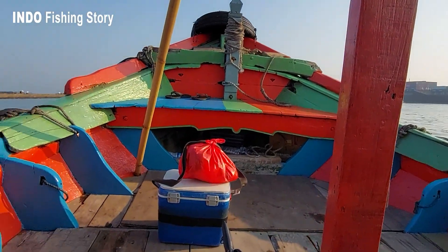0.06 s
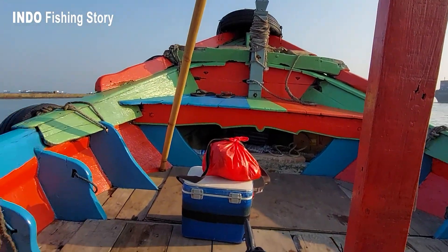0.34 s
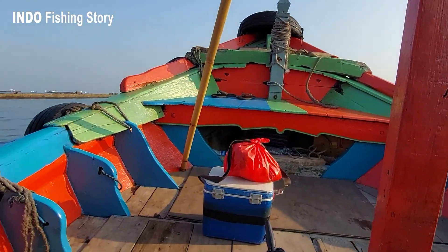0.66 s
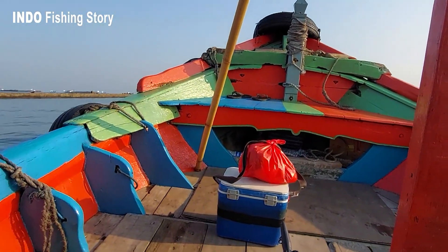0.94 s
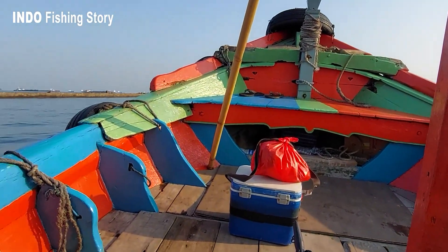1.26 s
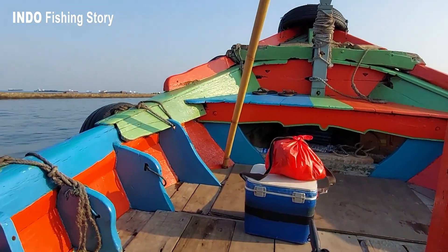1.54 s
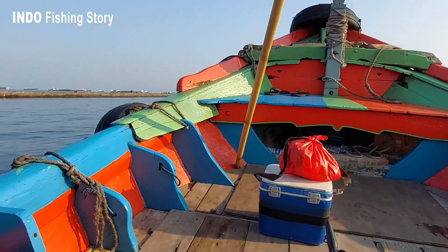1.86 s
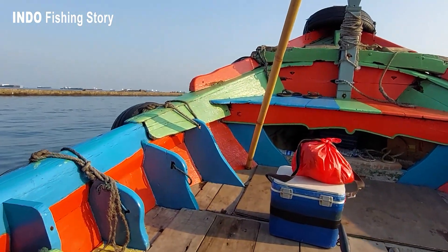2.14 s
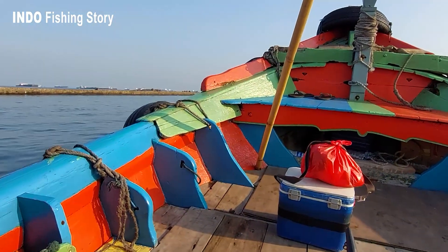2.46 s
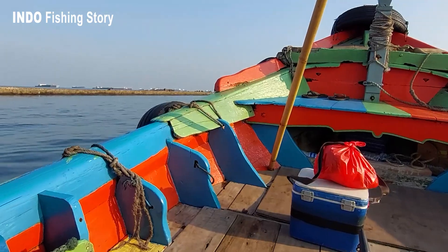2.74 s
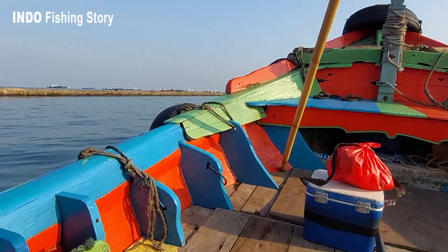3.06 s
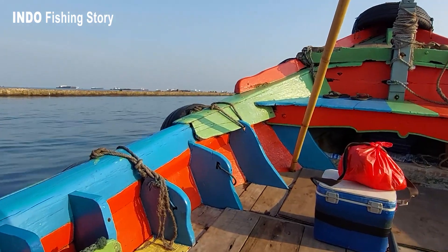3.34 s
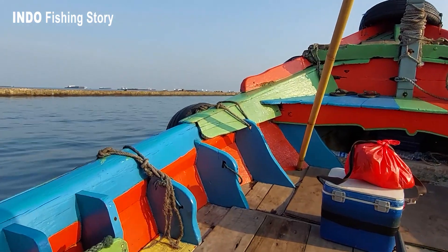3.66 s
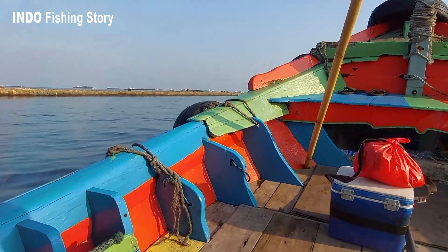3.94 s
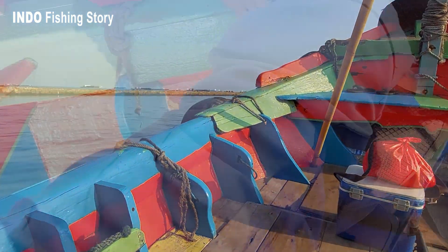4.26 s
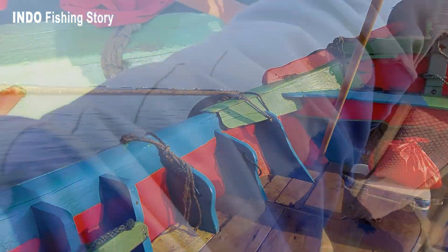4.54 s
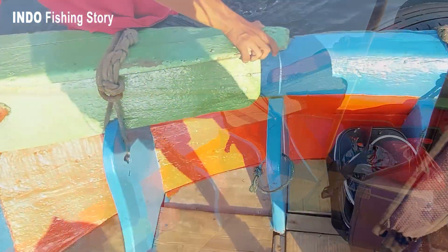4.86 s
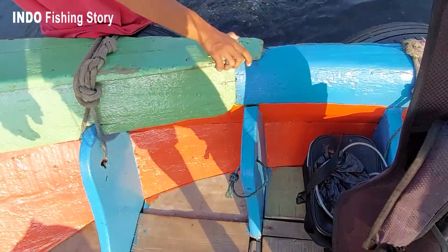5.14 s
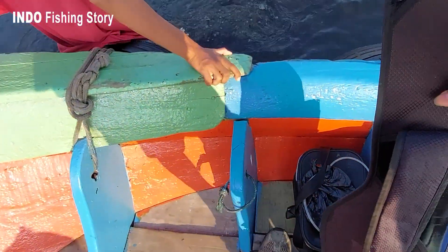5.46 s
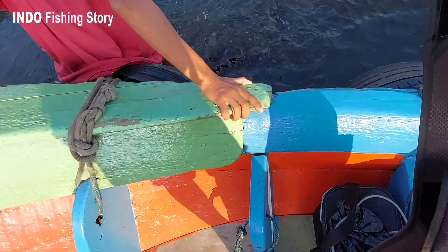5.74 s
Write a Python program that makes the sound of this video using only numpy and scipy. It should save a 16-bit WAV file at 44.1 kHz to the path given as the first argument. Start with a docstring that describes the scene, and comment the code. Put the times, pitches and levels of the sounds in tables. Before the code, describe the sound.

On board a small wooden boat, a one-cylinder engine chugs at a steady, rapid pace, booming in the hull with metallic clatter over a low wash. It gradually fades out. Then, close to the side, water rushes and sloshes with bubbles and hissing spray, while waves knock hollowly on the planks. The hardest knock, near the end, briefly overloads the microphone.

```python
"""On board a small wooden boat. First the one-cylinder inboard engine chugs steadily: each firing booms
in the hull; valves, piston, rod and injector clatter in between. It fades out by 4.2 s.
From 4.6 s, at the gunwale, water rushes along the side and waves knock on the planks, trapping air that
throbs. At 5.6 s the hardest knock overloads the microphone."""
import sys
import numpy as np
from scipy import signal
from scipy.fft import rfft, irfft, next_fast_len
from scipy.io import wavfile

SR = 44100
rng = np.random.default_rng(int(sys.argv[2]) if len(sys.argv) > 2 else 0)


def to_wav(s):
    """Save 16-bit WAV."""
    ch = np.atleast_2d(s).T  # columns
    pcm = np.round(np.clip(ch, -1, 1) * 32767)  # PCM
    wavfile.write(sys.argv[1], SR, pcm.astype(np.int16))


N = 259749
TIME, HZ = np.arange(N) / SR, np.fft.rfftfreq(next_fast_len(N, True), 1 / SR)
WATER_START_S = 4.562

# waves on the planks: start_s, pocket_db, pocket_hz, boom_db, splash_db
WAVE_SLAPS = [(4.658, -16, 690, -42, -27), (4.821, -8, 442, -40, -25), (4.8695, 5.5, 527, -21, -17),
              (4.927, -22, 400, -20, -23.5), (5.258, -8, 544, -45, -33), (5.324, -14, 249, -18, -48),
              (5.3935, -7.5, 680, -12, -21.5), (5.3982, -0.5, 436, -32, -48), (5.4025, -11.5, 328, -2, -48),
              (5.4234, -13, 480, -35, -48), (5.4325, -16, 410, -8, -52), (5.523, -6, 273, -34, -46),
              (5.5982, 4.5, 251, 4, -15.5), (5.616, -1, 443, -35, -50), (5.655, -24, 700, -28, -39),
              (5.7852, -5.5, 402, -36, -46)]
# left-right likeness of the noises: freq_hz, correlation
ENGINE_LIKENESS = [(100, 0.74), (280, 0.82), (500, 0.48), (1000, 0.099), (2000, -0.28), (5000, -0.017),
                   (15000, 0.057)]
WATER_LIKENESS = [(100, 0.95), (400, 0.78), (800, 0.13), (1600, 0), (3500, 0), (15000, 0)]


def engine(fade_start_s=.85, fade_end_s=4.19):
    """All engine parts over the boat's wash, fading out linearly."""
    wash = hull_wash()
    fade = np.interp(TIME, [fade_start_s, fade_end_s], [1, 0])
    return (exhaust() + piston() + rod() + clatter() + wash) * fade


def exhaust(side_s=.01207, side_db=-11, bow_s=.0262, bow_db=-12):
    """Each firing pulse rings pipe and hull; the far side and the bow throw it back."""
    # pipe and hull: freq_hz, level_db, t60_s
    modes = [(50.4, -30.5, 0.61), (98.3, -25, 0.48), (114.9, -24.5, 0.49), (136.5, -37.5, 0.92),
             (137.4, -22, 0.4), (166.7, -18, 1), (241.9, -15, 0.12), (325.4, -22.5, 0.14),
             (360.3, -37, 0.6), (397.5, -27.5, 0.43), (481, -31.5, 0.27), (506, -44.5, 0.22)]
    boom = each_cycle(ring(modes), 0, uneven_db=.6)
    muffler = band(.96, 470, order=7)
    echoes = amp(side_db) * delayed(side_s) + amp(bow_db) * delayed(bow_s)
    return coloured(boom, muffler * (1 + band(300, 559) * echoes)) * amp([[-.2], [0]])


def piston(delay_s=.0465, rise_s=.003, left_lag_s=.00027):
    """The piston knocks block and bed, which take a moment to ring up."""
    # block and bed: freq_hz, level_db, t60_s
    modes = [(60.9, -24.5, 0.31), (149.1, -22, 0.51), (184.37, -23.5, 0.78), (291.6, -27.5, 0.3),
             (413.2, -37.5, 0.7), (535.4, -37.5, 0.49), (636, -46.5, 0.23), (748, -31, .18),
             (812, -28.5, 0.16), (857, -23, 0.076), (874.6, -34, 0.32), (911, -35, .35),
             (1085, -47.5, 0.11), (1289, -34.5, 0.17), (1594, -37, 0.16)]
    knock = each_cycle(ring_up(ring(modes, np.sin), rise_s), delay_s, uneven_db=.7)
    # the hollow ring weakens as the microphone swings away
    hollow_gain = amp(-8) * (1 - mic_turn()) - amp(-9) * mic_turn()
    knock = knock + coloured(knock, band(720, 1700)) * hollow_gain
    return np.array([coloured(knock, delayed(left_lag_s)), knock]) * amp([[-.55], [1.5]])


def rod(delay_s=.0505, rise_s=.002):
    """The connecting rod takes up its play with one dry clack a cycle."""
    # rod: freq_hz, level_db, t60_s
    modes = [(882, -25, .04), (1595, -39, .05)]
    clack = ring_up(ring(modes, np.sin), rise_s)
    return each_cycle(clack, delay_s, uneven_db=2.5) * amp([[0], [-1]])


def clatter():
    """Each moving part sets off a short rattle at its own point in the cycle."""
    # valve lift, valve seating, piston slap, injector, its steel line, cover:
    # after_firing_s, level_db, rise_s, t60_s, low_hz, high_hz
    rattles = [(.022, -47.5, .002, 0.036, 6970, 16000), (0.0378, -37, 0.002, 0.045, 1200, 13030),
               (.040, -30, 0.006, 0.23, 700, 5010), (0.0537, -32, 0.0087, 0.1, 3000, 16000),
               (.055, -35, .005, .12, 3990, 5670), (.059, -37, .006, 0.28, 700, 4000)]
    # casing spectrum: freq_hz, density_db
    casing = [(500, 3), (900, -6), (1300, -5), (1700, -10.5), (2500, -12.5), (3200, -17.5), (5000, -15.5),
              (5900, -18.5), (8100, -17.5), (9100, -21), (11000, -16), (15800, -20)]
    # steel resonances: freq_hz, width_hz, gain_db
    steel = [(1990, 120, 3.5), (4010, 100, 4.5), (4720, 200, 3), (5650, 250, -2.5), (8100, 230, 4.5)]
    steel_db = sum(db / (1 + (2 * (HZ - hz) / width_hz) ** 2) for hz, width_hz, db in steel)
    colour = amp(curve(casing) + 3.2 * metal_ripple(spacing_hz=60) + steel_db)
    t, out = TIME[:SR // 5], np.zeros((2, N))
    for delay_s, db, rise_s, t60_s, low_hz, high_hz in rattles:
        burst = np.minimum(t / rise_s, 1) * amp(db - 60 * np.maximum(t - rise_s, 0) / t60_s)
        bursts = each_cycle(burst, delay_s, uneven_db=1.56)
        out += bursts * noise(colour * band(low_hz, high_hz, order=3), ENGINE_LIKENESS, grain_db=1.5)
    # the turning microphone catches more midrange
    midrange = mic_turn() * amp(-3) * coloured(out, band(2400, 3220))
    return (out + midrange) * amp([[-.4], [.4]])


def metal_ripple(spacing_hz):
    """Close resonances of thin metal parts: a random comb over frequency."""
    knots_hz = np.arange(0, SR, spacing_hz)
    return np.interp(HZ, knots_hz, rng.standard_normal(4096)[:len(knots_hz)])


def each_cycle(response, delay_s, uneven_db, first_firing_s=.0533):
    """One blow a cycle, delay_s after the firing, each setting off the response."""
    # engine speed: time_s, firing_hz
    speed = [(0, 12.44), (.3, 12.45), (.85, 12.5), (1.45, 12.425), (2, 12.44), (2.45, 12.49), (3.3, 12.465),
             (3.7, 12.5)]
    t = np.arange(-SR, N) / SR  # 1 s early: the hull already rings
    cycles = np.cumsum(np.interp(t, *np.transpose(speed))) / SR
    cycles -= np.interp(first_firing_s + delay_s, t, cycles)
    hits = np.flatnonzero(np.diff(np.floor(cycles)))
    blows = np.zeros(len(t))
    blows[hits] = amp(uneven_db * rng.standard_normal(size=128)[:len(hits)])
    return signal.oaconvolve(blows, response)[SR:SR + N]


def slaps(rise_s=.0015, splash_t60_s=.029, pocket_t60_cycles=9.6):
    """Each wave traps a throbbing air pocket, booms the hull and throws a splash."""
    # hull: freq_hz, level_db, t60_s
    modes = [(67.5, -20.5, .18), (120.5, -2.5, 0.096), (156.5, -5.5, 0.093), (214, -10.5, 0.13),
             (272, -13.5, 0.091), (415, -13.5, 0.1), (551, -25, 0.11), (647, -22, 0.07), (957, -23, 0.038),
             (1153, -25, 0.037)]
    t, out = TIME[:SR * 3 // 4], np.zeros((2, N))
    boom = ring(modes, np.sin)
    splash_noise = noise(band(390, 1500, order=2), WATER_LIKENESS)
    for start_s, pocket_db, hz, boom_db, splash_db in WAVE_SLAPS:
        pocket = ring([(hz, pocket_db, pocket_t60_cycles / hz)], np.sin) * amp([[-1.7], [1.5]])
        at = round(start_s * SR)
        splash = splash_noise[:, at - len(t):at] * amp(splash_db - 60 * t / splash_t60_s)
        # planks give way inward, against the pocket's swing
        add(out, start_s, ring_up(pocket - amp(boom_db) * boom + splash, rise_s))
    return out


def water(slosh_db=-28.5, splash_db=-42, easing_db_per_s=-2, crest_slosh_db=6):
    """Water rumbles under the hull, sloshes along it and breaks into drops and spray."""
    # spectra: freq_hz, density_db
    rumble_colour = [(20, -34.5), (35, -5), (50, 3), (105, 7), (160, 1), (250, -17), (500, -48)]
    slosh_colour = [(120, -26.5), (250, 5), (480, 0), (700, -6), (1000, -14.5), (2000, -49)]
    splash_colour = [(450, -17), (900, -3), (1500, 0), (2200, -4), (3200, -8.5), (4600, -9.5),
                     (7500, -16.5), (9000, -24), (15000, -36)]
    # small breaking crests: peak_s, length_s, level_db
    crests = [(4.588, 0.044, -38), (4.84, 0.06, -38), (5.148, 0.064, -41), (5.232, 0.079, -39)]
    crest_power = swell_power(crests)
    flow_db = easing_db_per_s * np.maximum(TIME - WATER_START_S, 0)
    slosh_power = amp(slosh_db + flow_db) ** 2 + amp(crest_slosh_db) ** 2 * crest_power + churn_power()
    splash_power = amp(splash_db + flow_db) ** 2 + crest_power
    rumble = noise(amp(curve(rumble_colour)), WATER_LIKENESS) * amp(-26 + drift(15))
    slosh = noise(amp(curve(slosh_colour)), WATER_LIKENESS, grain_db=3.5)
    slosh *= np.sqrt(slosh_power) * amp(1.57 * drift(40))
    splash = noise(amp(curve(splash_colour)), WATER_LIKENESS, grain_db=3)
    splash *= np.sqrt(splash_power) * amp(drift(45))
    return (rumble + slosh + splash + spray() + bubbles()) * amp([[-.5], [.5]])


def churn_power(re_pocket_db=-27, t60_s=.37):
    """Water stirred up by each slap, then settling."""
    return sum((TIME > start_s) * amp(db + re_pocket_db - 60 * abs(TIME - start_s) / t60_s) ** 2
               for start_s, db, *_ in WAVE_SLAPS)


def bubbles(count=260, low_hz=600, high_hz=7000, level_db=-42, t60_cycles=64):
    """Drops and a crowd of small bubbles ping, rising in pitch."""
    # single drops: start_s, level_db, pitch_hz
    drops = [(4.909, -34, 3560), (4.977, -29.5, 4150), (5.081, -28, 7400), (5.088, -31, 3440),
             (5.123, -30, 5050), (5.228, -28, 1900), (5.317, -32, 8500), (5.537, -30, 4800),
             (5.852, -35, 4300)]
    t, out = TIME[:SR // 20], np.zeros((2, N))
    when, smallness, strength = rng.random((count, 3)).T
    crowd = np.transpose([WATER_START_S + when * (TIME[-1] - WATER_START_S),
                          level_db + 12 * strength ** 2 - 7 * smallness,
                          low_hz * (high_hz / low_hz) ** smallness])
    left_shares = rng.uniform(.11, 1, count + len(drops))
    for (start_s, db, hz), left in zip(np.vstack([drops, crowd]), left_shares):
        ping = np.sin(2 * np.pi * hz * t * (1 + 2.5 * t)) * amp(db - 60 * t * hz / t60_cycles)
        add(out, start_s, np.sqrt([[left], [1 - left]]) * ring_up(ping, 1 / hz))
    return out


def spray(steady_db=-55):
    """Spray hisses down in showers; four treble bands flicker separately, the finest droplets tick."""
    # spectrum: freq_hz, density_db
    colour = [(3000, -9), (5000, -4), (7500, 2), (9300, -7), (12000, 1), (15500, -0.5)]
    # showers: peak_s, length_s, level_db
    showers = [(4.675, 0.028, -46.5), (4.782, 0.027, -43), (4.85, .07, -50), (5.03, .045, -43.5),
               (5.15, 0.043, -44), (5.27, .08, -46), (5.498, 0.03, -42), (5.77, .13, -47.5),
               (5.87, .06, -52)]
    edges_hz = np.geomspace(4000, 17000, 5)
    hiss = noise(amp(curve(colour)), WATER_LIKENESS, grain_db=2)
    flicker = sum(coloured(hiss, band(low_hz, high_hz, order=8)) * amp(2 * drift(30))
                  for low_hz, high_hz in zip(edges_hz, edges_hz[1:]))
    ticks = noise(band(11000, 16000), WATER_LIKENESS, grain_db=5.5)
    envelope = np.sqrt(amp(steady_db) ** 2 + swell_power(showers))
    return unit_rms(unit_rms(flicker) + amp(-3) * ticks) * envelope


def hull_wash(level_db=-27):
    """Steady rumble and wash of the moving boat."""
    # spectrum: freq_hz, density_db
    colour = [(38, -16), (50, -13), (75, 1.5), (150, -2), (230, 0), (380, -0.5), (600, -6), (1100, -11),
              (2500, -20), (6000, -29.5), (15000, -36)]
    return noise(amp(curve(colour)), ENGINE_LIKENESS) * amp(level_db + drift(9))


def mic_turn():
    """Microphone swing across the boat: 0 at 1 s, 1 at 3 s."""
    return np.interp(TIME, [1, 3], [0, 1])


def swell_power(events):
    """Summed power of bell-shaped swells."""
    return sum(amp(db - 12 * ((TIME - peak_s) / length_s) ** 2) ** 2 for peak_s, length_s, db in events)


def ring(modes, wave=np.cos):
    """Decaying modes after one blow."""
    t = TIME[:SR * 3 // 4]
    return sum(amp(db - 60 * t / t60_s) * wave(2 * np.pi * hz * t) for hz, db, t60_s in modes)


def ring_up(sound, rise_s):
    """Exponential attack."""
    return sound * (1 - np.exp(-TIME[:sound.shape[-1]] / rise_s))


def noise(gain, likeness, grain_db=0):
    """Stereo noise, rms 1; uneven grains make it crackle."""
    white = rng.standard_normal((2, N)) * amp(grain_db * np.minimum(rng.exponential(1, N), 7))
    correlation = np.clip(curve(likeness), -1, 1)
    mid, side = coloured(white, gain * np.sqrt([1 + correlation, 1 - correlation]))
    return unit_rms(np.array([mid + side, mid - side]))


def drift(top_hz):
    """Smooth random wander, rms 1."""
    hz = np.geomspace(top_hz / 8, top_hz, 16)[:, None]
    coarse_s = TIME[::64]
    wander = np.sin(2 * np.pi * (hz * coarse_s + rng.random((16, 1)))).sum(0)
    return unit_rms(np.interp(TIME, coarse_s, wander))


def coloured(x, gain):
    """Filter by a gain over HZ."""
    size = next_fast_len(N, True)
    return irfft(rfft(x, size) * gain, size)[..., :N]


def band(low_hz, high_hz, order=4):
    """Band-pass gain over HZ."""
    return ((1 + (low_hz / (HZ + 1)) ** (2 * order)) * (1 + (HZ / high_hz) ** (2 * order))) ** -.5


def delayed(delay_s):
    """A delay as complex gain over HZ."""
    return np.exp(-2j * np.pi * HZ * delay_s)


def curve(points):
    """Rows of freq_hz, value, interpolated over log HZ."""
    hz, value = np.transpose(points)
    return np.interp(np.log(HZ + 1), np.log(hz + 1), value)


def amp(db):
    """Decibels to gain."""
    return 10 ** (np.asarray(db) / 20)


def unit_rms(x):
    """Scale to rms 1."""
    return x / np.sqrt(np.mean(x ** 2) + 1e-20)


def add(mix, start_s, sound):
    """Mix a sound in at start_s."""
    part = mix[..., round(start_s * SR):][..., :sound.shape[-1]]
    part += sound[..., :part.shape[-1]]


def scene():
    """First the engine, then the water at the side."""
    water_gate = np.clip((TIME - WATER_START_S) / .0047, 0, 1)
    return engine() + (water() + slaps()) * water_gate


def record(dry, low_cut_hz=42, high_cut_hz=16000):
    """Microphone: two slightly unlike ports, bass cut, overload on the hardest knock, band limit."""
    # port mismatch: freq_hz, left_over_right_db
    mismatch = [(150, 0.7), (300, 0), (520, -1.5), (1000, -0.7), (2100, 1.6), (4000, 0.3), (8000, 0.5),
                (12500, -1.5)]
    ports = amp(curve(mismatch) * np.array([[.5], [-.5]]))
    clipped = np.clip(coloured(dry, ports * band(low_cut_hz, SR, order=8)), -1, 1)
    low_pass = signal.firwin(511, high_cut_hz, window=("kaiser", 9), fs=SR)
    return signal.oaconvolve(clipped, low_pass[None], "same")


dry = scene()
out = record(dry)
to_wav(out)
```